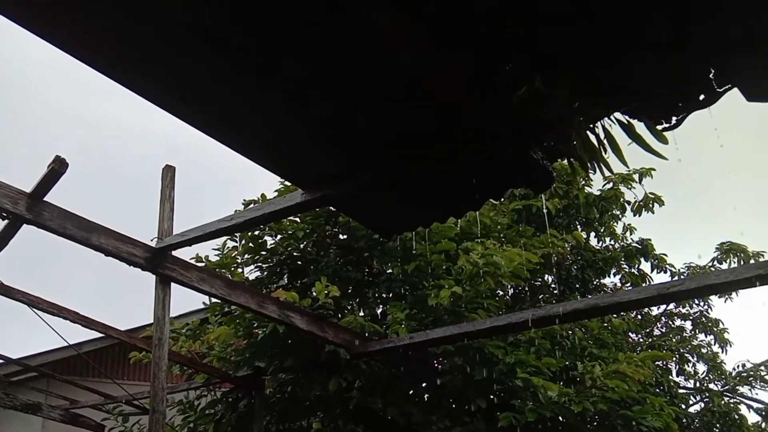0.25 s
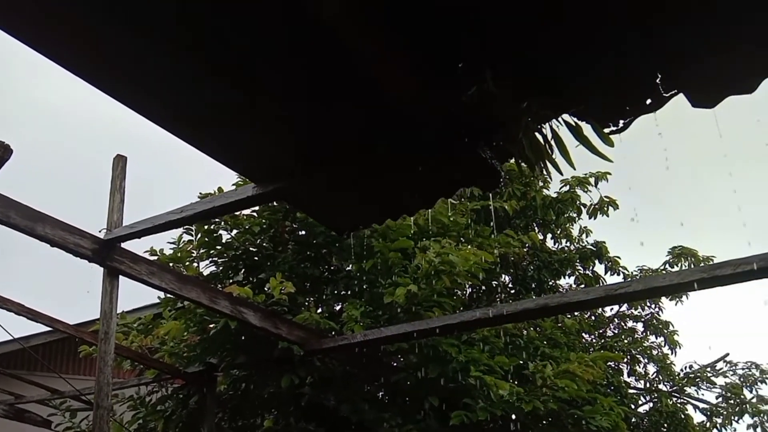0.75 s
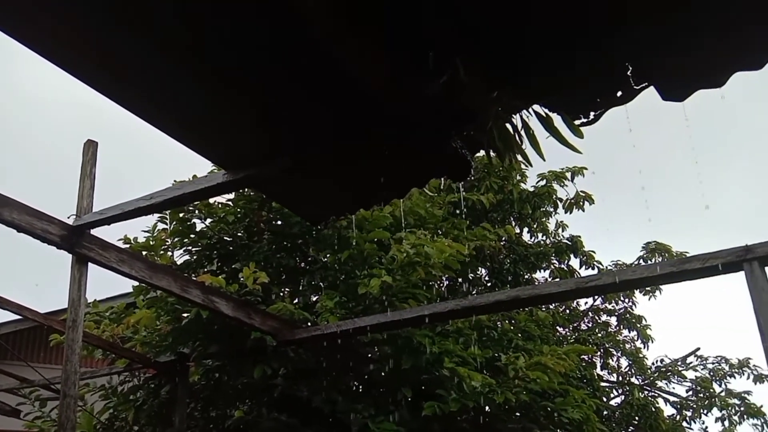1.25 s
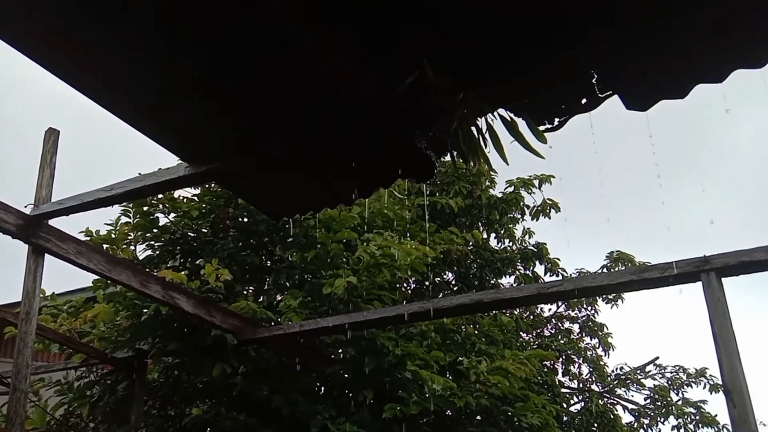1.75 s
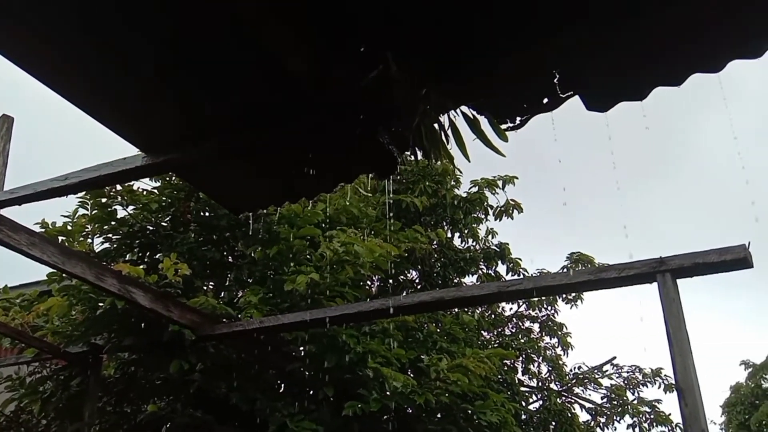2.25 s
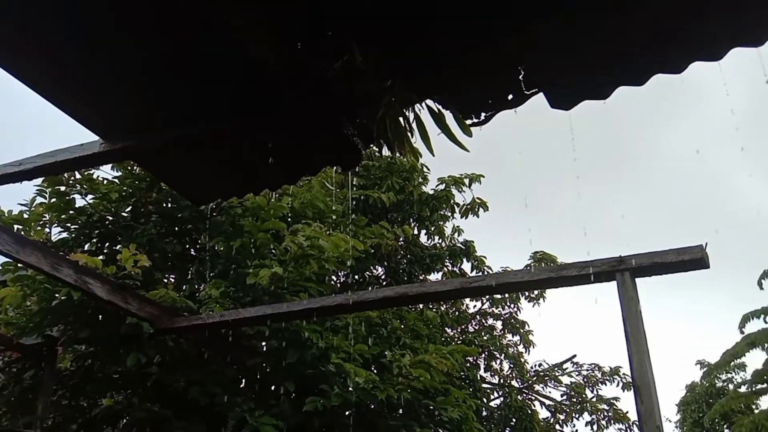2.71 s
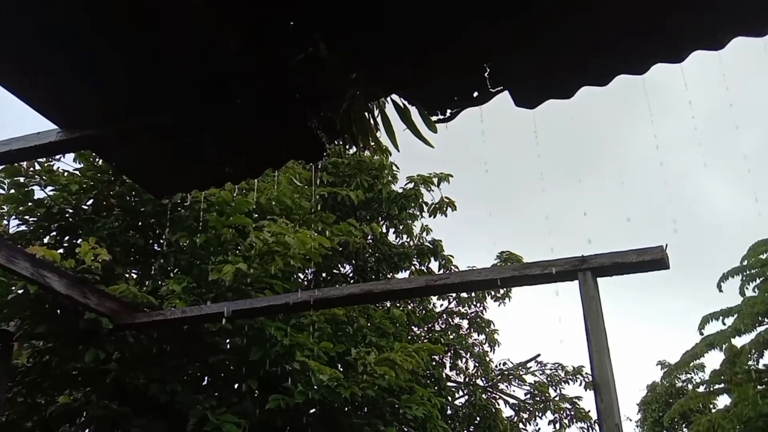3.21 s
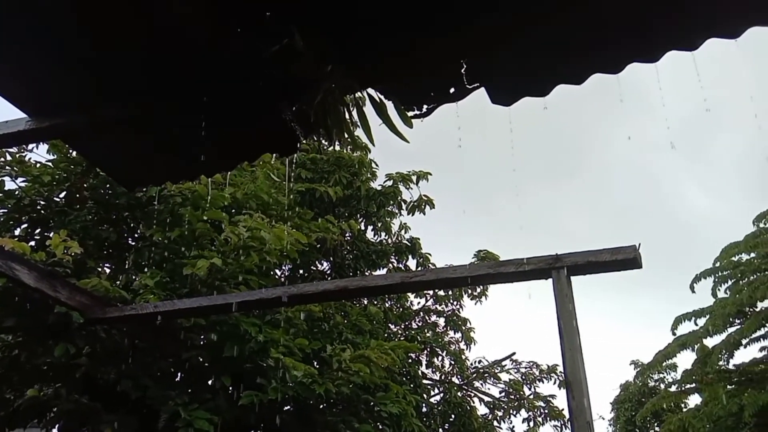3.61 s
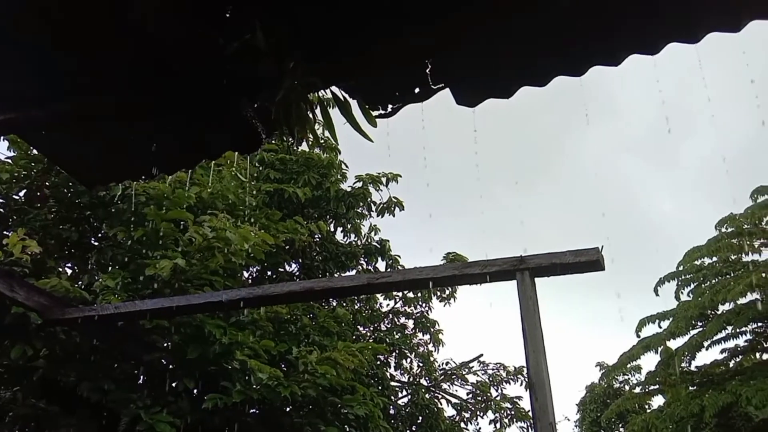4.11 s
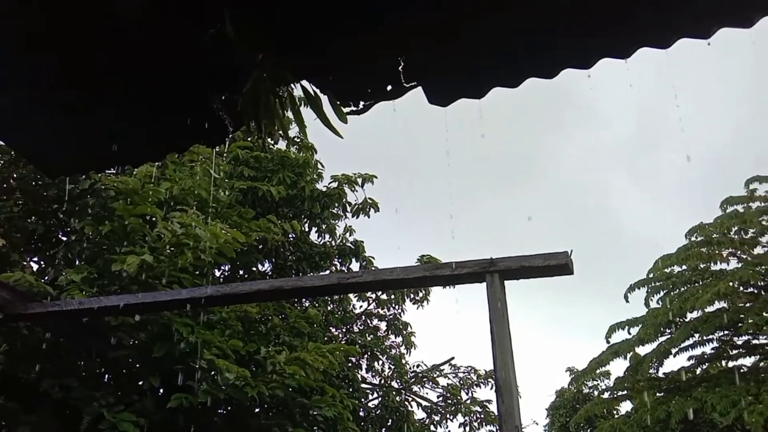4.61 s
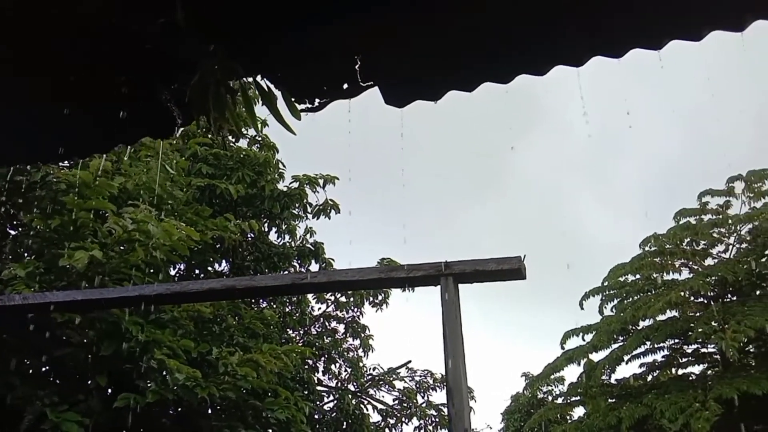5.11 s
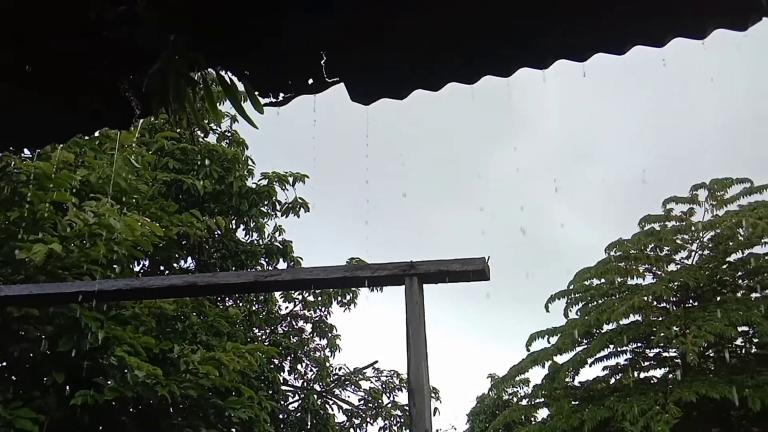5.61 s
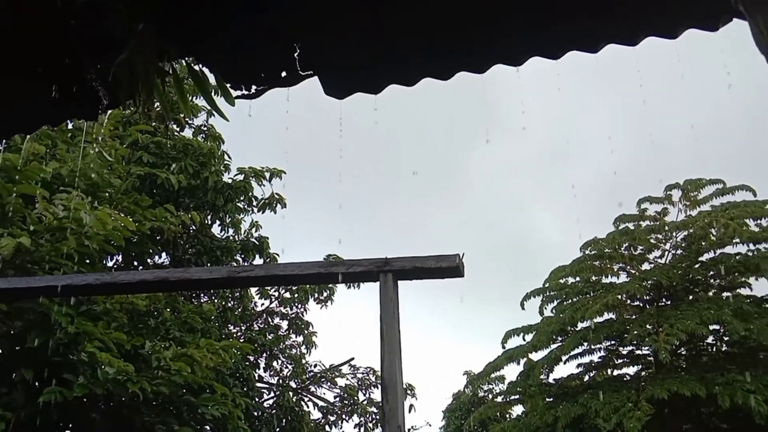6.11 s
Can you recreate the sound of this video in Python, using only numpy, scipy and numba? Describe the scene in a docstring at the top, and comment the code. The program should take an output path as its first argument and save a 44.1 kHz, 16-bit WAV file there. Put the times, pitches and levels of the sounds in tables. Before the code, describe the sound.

Continuous rain and roof run-off surround a sheltered listener. Strings of water break on the ground in dense fine splats and clicks, swelling and easing over distant hiss. Sharp watery ticks come irregularly from close by, while scattered heavy drops make short, dry metal knocks with a small rattle and quick echoes under the roof. A quiet, single-pitched hollow resonance trembles within the wet texture, picked up by a modest handheld microphone.

```python
"""Hiss of steady rain, heard through a phone microphone from under a corrugated metal roof.
Far rain is shaped noise with puddle plops; eaves run-off splashes in spurts; a hollow nearby hums on one note
from a close pair of resonances; dense short rings lie within the hiss. Near drips tick with a spray of noise,
and heavy drops knock the sheet: decaying modes and a rattle, with early echoes under the roof."""
import sys
import numpy as np
from scipy import signal
from scipy.fft import rfft, irfft
from scipy.io import wavfile
from scipy.ndimage import uniform_filter1d
from numba import njit

SR = 44100
rng = np.random.default_rng(int(sys.argv[2]) if len(sys.argv) > 2 else 0)


def put_to_file(sound):
    """Save the sound as 16-bit audio at rate SR, in the file named by the first command-line argument."""
    columns = np.atleast_2d(sound).T  # one column per channel
    safe = np.clip(columns, -1, 1)
    whole_steps = np.round(safe * 32767)
    wavfile.write(sys.argv[1], SR, whole_steps.astype(np.int16))


N = 280035  # length in samples, about 6.35 s


def undb(db):
    """Amplitude factor of a level in dB."""
    return 10 ** (np.asarray(db) / 20)


def level(x, db):
    """Scale a signal to an RMS level in dB."""
    return x * undb(db) / np.sqrt(np.mean(x ** 2))


def fading(t, t60):
    """Exponential decay that loses 60 dB in t60 seconds."""
    return np.exp(-np.log(1000) * t / t60)


def follow(points):
    """Straight lines through (time [s], level [dB]) points, one dB value per sample."""
    return np.interp(np.arange(N) / SR, *np.transpose(points))


def gain_at(hz, points):
    """Gain of (frequency [Hz], level [dB]) points joined on a log frequency axis."""
    point_hz, db = np.transpose(points)
    return undb(np.interp(np.log(hz + 1), np.log(point_hz), db))


def colour(x, points, size=8192):
    """Causal minimum-phase filter from the folded cepstrum of the log gain."""
    cepstrum = irfft(np.log(gain_at(np.arange(size // 2 + 1) * SR / size, points)))
    cepstrum[1:size // 2] *= 2
    cepstrum[size // 2 + 1:] = 0
    impulse = irfft(np.exp(rfft(cepstrum)))
    return signal.fftconvolve(x, impulse)[:len(x)]


def band(x, hz, width):
    """Resonance of a given width in Hz, with gain 1 at the centre."""
    b, a = signal.iirpeak(min(hz, .45 * SR), hz / width, fs=SR)
    return signal.lfilter(b, a, x)


def walk(rate):
    """Random levels held 1 / rate s and slewed twice; spread near 1."""
    hold = int(SR / rate)
    steps = np.repeat(rng.standard_normal(N // hold + 1), hold)
    return 1.3 * uniform_filter1d(uniform_filter1d(steps, hold), hold)[:N]


def sizes(chance, spread_db, most):
    """Random drop sizes: many near 1, a few far from it, none beyond spread_db * most in dB."""
    return undb(spread_db * np.minimum(-np.log(1 - chance), most))


@njit
def grains(start, hz, cycles, size, length):
    """Each drop is a sine that swells for a moment and dies 60 dB within its cycles."""
    out = np.zeros(length)
    for k in range(len(start)):
        fade = np.exp(-np.log(1000) * hz[k] / SR / cycles[k])
        turn = fade * np.exp(2j * np.pi * hz[k] / SR)
        z, onset = size[k] + 0j, 1.
        for i in range(start[k], min(length, start[k] + int(cycles[k] * SR / hz[k]) + 1)):
            out[i] += 2.5 * (1 - onset) ** 2 * z.imag
            z *= turn
            onset *= fade ** 3
    return out


def scatter(count, lo_hz, hi_hz, cycles, spread_db):
    """Drops at random moments and pitches, ringing for half to one and a half times the cycles."""
    when, pitch, ring, big = rng.random((count, 4)).T
    hz = lo_hz * (hi_hz / lo_hz) ** pitch
    # the square root offsets the shorter ring of high drops
    size = sizes(big, spread_db, most=3.97) * np.sqrt(hz)
    return grains((when * N).astype(np.int64), hz, cycles * (.5 + ring), size, N)


def thirds(points):
    """Noise of a given spectrum split into overlapping third octaves: (centre in Hz, band)."""
    hz = np.arange(N // 2 + 1) * SR / N
    noise = rfft(rng.standard_normal(N)) * gain_at(hz, points)
    for centre in 20 * 2 ** (np.arange(30) / 3):
        distance = np.clip(3 * np.log2((hz + 1) / centre), -1, 1)
        share = np.cos(np.pi / 2 * distance) ** 2
        yield centre, irfft(noise * share, N)


def flickering(points, swell_db, flicker_db, rate, bright_hz):
    """Noise bands that swell together and flicker alone: (dull part, bright part)."""
    swell, parts = walk(1.99), np.zeros((2, N))
    for centre, x in thirds(points):
        parts[int(centre > bright_hz)] += x * undb(swell_db * swell + flicker_db * walk(rate))
    return parts


def far_rain():
    """Countless distant drops blur into hiss, with dull plops from puddles."""
    # spectrum of the distant rain, before each part is levelled: (frequency [Hz], density [dB per Hz])
    rain_spectrum = [(25, -8), (60, -14), (120, -6), (250, -4), (500, -7), (1000, -5), (2000, -10.5),
                     (3500, 2.5), (6000, 1), (16000, -2)]
    # quick rises and lulls of the bright rain hiss: (time [s], level [dB])
    bright_levels = [(0, -36.5), (.28, -35.5), (.66, -35.5), (.74, -33), (.96, -38.5), (1.15, -31),
                     (1.33, -37.5), (1.6, -39.5), (1.86, -36.5), (2.19, -36.5), (2.6, -36.5), (2.76, -35.5),
                     (3.09, -38), (3.29, -37.5), (3.71, -37.5), (3.8, -38.5), (3.96, -38), (4.1, -37),
                     (4.42, -39.5), (4.56, -36.5), (4.75, -43), (4.91, -35), (5.02, -38.5), (5.1, -41.5),
                     (5.2, -36.5), (5.31, -36), (5.45, -39), (5.6, -40.5), (5.75, -41.5), (5.87, -34.5),
                     (5.94, -41), (6.05, -39), (6.2, -36), (6.35, -38)]
    dull, bright = flickering(rain_spectrum, swell_db=.8, flicker_db=2.0, rate=9, bright_hz=1500)
    bright_db = follow(bright_levels) + 0.83 * walk(14)
    hiss = level(dull, -52) + level(bright, 0) * undb(bright_db)
    plops = level(scatter(count=500, lo_hz=183.3, hi_hz=880, cycles=10.3, spread_db=3.5), -57.5)
    return hiss + plops


def splats(points, count, octaves, spread_db, t60, t60_tilt):
    """Bursts of hiss around random pitches: sudden start, shorter tail in the treble."""
    when, pitch, big = rng.random((count, 3)).T
    hz = 500 * 32 ** pitch  # 500 Hz to 16 kHz
    power = sizes(big, spread_db, most=3) ** 2
    out = 0
    for centre, x in thirds(points):
        nearness = np.exp(-(np.log2(hz / centre) / octaves) ** 2)
        hits = np.bincount((when * N).astype(int), power * nearness, N)
        band_t60 = t60 * (centre / 4000) ** -t60_tilt  # t60 itself holds at 4 kHz
        fade = np.exp(-2 * np.log(1000) / SR / band_t60)  # power fades twice as fast in the exponent
        out = out + x * np.sqrt(signal.lfilter([1 - fade], [1, -fade], hits))
    return out


def runoff():
    """Water strings from the eaves break on the ground in narrow and broad splats, drops and clicks."""
    # spurts and lulls of the eaves: (time [s], splash level [dB])
    spurts = [(0.0, -34.5), (0.26, -31.5), (0.55, -39.5), (1.18, -35), (1.84, -30.5), (2.16, -39),
              (2.42, -37.5), (2.55, -38.5), (3.27, -33.5), (3.77, -40), (4.47, -38.5), (4.56, -34.5),
              (4.9, -35.5), (5.0, -39.5), (5.78, -36.5), (5.91, -36.5), (6.08, -41), (6.35, -34.5)]
    # spectrum of the splash noise, before levelling: (frequency [Hz], density [dB per Hz])
    splash_spectrum = [(300, -12), (800, 1.5), (2000, -3.5), (3000, 2.5), (6000, -2), (10000, 0),
                       (16000, 8)]
    spray = level(splats(splash_spectrum, count=2500, octaves=0.17, spread_db=3.5, t60=0.22, t60_tilt=0.12), -2.06)
    slaps = level(splats(splash_spectrum, count=250, octaves=1.3, spread_db=4.0, t60=0.11, t60_tilt=0.18), -6)
    # the negative spread makes a few drops smaller than the rest
    drops = level(scatter(count=8000, lo_hz=1780, hi_hz=16000, cycles=4.6, spread_db=-2.5), -15.0)
    clicks = level(scatter(count=900, lo_hz=4530, hi_hz=13000, cycles=3.5, spread_db=4.5), -15)
    return undb(follow(spurts)) * (spray + slaps + drops + clicks)


def hollow():
    """Drops and a trickle stir a hollow, whose close pair of modes beats and wavers."""
    # the pair of modes: (frequency [Hz], width [Hz], relative level [dB])
    hollow_modes = [(1255.6, 28, 1.5), (1288.5, 42, 0)]
    # the hum swells and sinks: (time [s], level [dB])
    hum_swells = [(0, -41), (.12, -44), (.42, -45), (.63, -41), (1.4, -45.5), (1.63, -40.5), (1.84, -43.5),
                  (2.17, -43), (3.22, -43), (3.75, -42.5), (4.1, -40.5), (4.47, -44), (4.76, -44.5),
                  (4.95, -41.5), (5.39, -47), (5.66, -38), (5.89, -43.5), (6.35, -42)]
    when, side, big = rng.random((1200, 3)).T
    pushes = np.sign(side - .5) * sizes(big, 2.6, most=3.9)
    drops = np.bincount((when * N).astype(int), pushes, N)
    trickle = level(rng.standard_normal(N), 1)
    stir = level(drops, 0) + trickle
    hum = sum(undb(db) * band(stir, hz, width) for hz, width, db in hollow_modes)
    waver_db = 1.5 * walk(25)
    return level(hum * undb(waver_db), 0) * undb(follow(hum_swells))


def short_rings():
    """Dense short narrow rings at random pitches within the hiss, a lower and a higher cloud."""
    low_rings = level(scatter(count=3000, lo_hz=307.3, hi_hz=3044, cycles=57, spread_db=6.5), -53.5)
    high_rings = level(scatter(count=7000, lo_hz=1500, hi_hz=14000, cycles=110, spread_db=2.4), -41.5)
    return low_rings + high_rings


def ticks(s, peak_db, hz, cycles, spray_db, spray_t60):
    """A short tick at each drop's pitch, an overtone that high drops lack, a ground echo and a hiss of spray."""
    delay_s = .0012  # short fixed delay from the listed time to the tick
    start = ((s + delay_s) * SR).astype(np.int64)
    cycles = np.clip(cycles, 1, 40)
    out = grains(start, hz, cycles, undb(peak_db), N + SR)
    overtone_hz = np.minimum(1.78 * hz, .4 * SR)
    overtone_db = peak_db + 3.5 - 2.1 * hz / 1000
    out = out + grains(start, overtone_hz, cycles, undb(overtone_db), N + SR)
    out = out + undb(-13.5) * np.roll(out, int(0.0045 * SR))  # ground echo
    t = np.arange(SR // 4) / SR
    for k in range(len(s)):
        hiss, grain = rng.standard_normal((2, len(t)))
        # the spray is made of droplets: its level jitters by 3 dB, smoothed over 1/600 s
        grain_db = 3 * level(uniform_filter1d(grain, SR // 600), 0)
        high_pass = signal.butter(6, hz[k] * 0.7, "high", fs=SR, output="sos")
        hiss = signal.sosfilt(high_pass, hiss * undb(grain_db))
        hiss = band(band(hiss, hz[k] * 0.97, hz[k] * 0.53), hz[k] * 1.06, hz[k] * 1.4)
        swell = 1 - np.exp(-t / 0.0044)
        out[start[k]:start[k] + len(t)] += level(hiss, spray_db[k]) * swell * fading(t, spray_t60[k])
    return out[:N]


def drips():
    """Near drips with the fine spatter they throw off, and stray droplets in the high treble."""
    # near drips, spray level before its swell and fade: (time [s], tick strength [dB],
    # pitch [Hz], spray level [dB], spatter strength [dB])
    near_drips = [(0.07, -22, 7440, -35, -40), (0.08, -20, 9400, -15.5, -40), (0.13, -24, 3000, -40, -40),
                  (0.5105, -25, 5450, -30.5, -40), (0.7114, -27, 3500, -30, -26),
                  (0.713, -23, 5800, -31, -40), (0.738, -26, 3400, -31, -40), (0.773, -24, 6640, -35, -40),
                  (0.842, -18, 8920, -33, -40), (1.057, -21, 8540, -25, -40), (1.131, -18, 10600, -28, -40),
                  (1.1798, -19, 9350, -19, -40), (1.321, -16, 9590, -24, -40),
                  (1.3622, -30, 6650, -46, -15), (1.403, -24, 7150, -31.5, -13),
                  (1.502, -18, 7360, -34, -28.5), (1.6255, -14.5, 5500, -34, -11.5),
                  (1.9063, -20, 6150, -32, -20), (2.325, -27, 7000, -34.5, -40),
                  (2.373, -20, 6980, -37, -16), (2.476, -20, 9600, -21, -40), (2.5226, -20, 6870, -44, -40),
                  (2.62, -17, 10100, -20, -40), (2.6286, -19, 4600, -34, -40), (2.66, -26, 3780, -31, -40),
                  (2.7488, -16, 7150, -38, -40), (2.822, -16, 10400, -26, -40),
                  (2.8904, -27, 3030, -30.5, -40), (2.92, -19, 9110, -30, -40),
                  (3.1304, -28, 3540, -31.5, -40), (3.2785, -27, 4800, -34, -40),
                  (3.3434, -26, 5750, -29, -40), (3.7442, -22, 4300, -33, -40),
                  (3.752, -27, 3000, -38, -40), (3.77, -21, 8560, -26, -40), (3.786, -20, 5500, -34, -17.5),
                  (3.9855, -9.5, 5850, -32, -2.5), (4.061, -25, 5540, -44, -40),
                  (4.1194, -28, 3460, -47, -40), (4.192, -20, 7310, -49, -22), (4.247, -23, 5400, -33, -15),
                  (4.485, -21, 9040, -23, -37), (4.5575, -17.5, 10600, -23, -40),
                  (4.592, -24, 4030, -36, -26), (4.768, -21, 5520, -40, -21), (4.8206, -31, 3510, -36, -16),
                  (4.803, -20, 5600, -50, -40), (4.8656, -28, 5600, -32.5, -40),
                  (4.947, -31, 3950, -33, -30), (5.093, -12, 10000, -36, -48),
                  (5.1182, -17, 5730, -41, -34), (5.15, -31, 3850, -33, -40), (5.208, -27, 3180, -31, -40),
                  (5.339, -17, 5630, -34, -14.5), (5.77, -12.5, 2970, -30, -19),
                  (5.846, -33, 2880, -34, -40), (5.869, -29, 2650, -49, -40), (5.9518, -21, 5030, -47, -23),
                  (6.2077, -24, 2850, -32.5, -40), (6.251, -11, 10300, -28, -40)]
    ring_cycles = 13  # at 5 kHz; lower drips ring for more cycles
    spray_t60_s, tiny_spray_t60_s, tiny_hz = 0.25, 0.036, 8000  # drips above tiny_hz are tiny
    s, peak_db, hz, spray_db, spatter_db = np.transpose(near_drips)
    same = np.ones(len(s))
    cycles = ring_cycles * (hz / 5000) ** -.5
    body = ticks(s, peak_db, hz, cycles, spray_db, np.where(hz > tiny_hz, tiny_spray_t60_s, spray_t60_s))
    spatter = ticks(s, spatter_db, 8530 * same, ring_cycles * same, spatter_db - 14, tiny_spray_t60_s * same)
    strays = level(scatter(count=40, lo_hz=8200, hi_hz=9600, cycles=18, spread_db=1.5), -59)
    return body + spatter + strays


def knocks():
    """A heavy drop rings the sheet's modes, most near its favoured pitches, and leaves a rattle."""
    # heavy drops: (time [s], level of the modes over the first 20 ms [dB], favoured low [Hz],
    # favoured middle [Hz], favoured high [Hz], deep share [dB], middle share [dB], bright share [dB],
    # rattle relative to the modes [dB])
    heavy_drops = [(0.172, -27, 904, 1720, 3900, -7, 1.5, 4, -8),
                   (1.1863, -26.5, 1050, 2050, 4320, -18, -8, 0, -20),
                   (1.1932, -31, 1290, 2050, 4370, -16, -2, 1, -3),
                   (1.256, -41, 1000, 2620, 4500, -1, -11, -4, -10),
                   (1.519, -42, 1030, 1720, 3040, 12, -12, 7, -4),
                   (4.445, -38.5, 1290, 2160, 4460, -4, 3, 9, -2),
                   (4.528, -33, 1290, 2620, 4500, -5, 0, 4, -8),
                   (4.5328, -28.5, 1290, 2600, 3320, -2, 3, 5.5, -6),
                   (5.493, -38.5, 970, 1720, 2620, -4, -15, 1, -10),
                   (5.614, -29, 1730, 3570, 4320, -6, 1, 8, -5.5),
                   (5.7005, -33, 1150, 1720, 2600, -9, 0, 2.5, -13),
                   (6.089, -40, 950, 1720, 3100, 3, -6, 13, 1),
                   (6.311, -39, 694, 1720, 3800, 11, 2, 15, -10)]
    # modes of the metal sheet: (frequency [Hz], relative level [dB], 60 dB decay [s])
    sheet_modes = [(503, -23, 0.08), (625, -5, 0.031), (724, -1.5, 0.048), (945, 4, 0.042),
                   (1098, 3.5, 0.034), (1170, -19, 0.034), (1278, 3, 0.088), (1490, 3, 0.04),
                   (1720, -1, 0.058), (1860, 4, 0.037), (2080, -22, 0.034), (2593, -4.5, 0.043),
                   (2800, -4, 0.035), (3280, -6.5, 0.07), (3467, -1.5, 0.036), (3700, -6, 0.035),
                   (3880, -7.5, 0.042), (4324, 0.5, 0.033), (4564, -5.5, 0.043), (5060, -3.5, .03)]
    favour_db, first = 7, int(.02 * SR)  # lift of the favoured modes; samples that set a knock's level
    out, t = np.zeros(N + SR), np.arange(SR // 4) / SR
    hz, db, t60 = np.transpose(sheet_modes)
    decays = fading(t, t60[:, None])
    for s, level_db, low_hz, middle_hz, high_hz, deep_db, middle_db, bright_db, rattle_db in heavy_drops:
        level_draw, pitch_draw, sign_draw = rng.standard_normal((3, len(hz)))
        favoured = ((low_hz, .1), (middle_hz, .04), (high_hz, .04))
        near = sum(np.exp(-(np.log(hz / f) / wide) ** 2) for f, wide in favoured)
        share_db = np.select([hz > 2300, hz > 1400, hz < 850], [bright_db, middle_db, deep_db], 0)
        gain = undb(db + 1.5 * level_draw + favour_db * near + share_db)
        mode_hz = hz * (1 + 0.0083 * pitch_draw)
        # each mode starts up or down at random
        modes = (gain * np.sign(sign_draw)) @ (np.sin(2 * np.pi * np.outer(mode_hz, t)) * decays)
        noise = rng.standard_normal((2, len(t)))
        low = band(band(noise[0], 1150, 1100), 1150, 1100)
        high = band(band(noise[1], high_hz, 3500), high_hz, 3500)
        # the rattle is duller than the modes
        rattle = (low + undb(bright_db - 10) * high) * fading(t, 0.23)
        blow = modes / modes[:first].std() + undb(rattle_db) * rattle / rattle[:first].std()
        blow = blow * (1 - np.exp(-t / .0005))  # short rise
        begin = int(s * SR)
        out[begin:begin + len(t)] += undb(level_db) * blow
    return out[:N]


def shelter(x):
    """Early echoes under the roof, delayed copies whose ends wrap round to the start."""
    # echoes off ground, beams and wall: (delay [s], level [dB])
    echo_paths = [(.005, -2.5), (.0095, -6), (0.02, -9)]
    return x + sum(undb(db) * np.roll(x, int(s * SR)) for s, db in echo_paths)


def scene():
    """The sheet knocks in the shelter, over the spread-out rain and the near drips."""
    return (far_rain() + runoff() + hollow() + short_rings() + drips() + shelter(knocks()))[None]


def record(dry):
    """The microphone drops the deep bass, its port notches and dulls the treble; the top is cut."""
    # treble response of the microphone: (frequency [Hz], gain [dB])
    mic_response = [(4000, 0), (4900, -1), (5700, 3), (6250, -3.5), (6750, 3), (7450, 2), (8050, -8.5),
                    (9200, -6.5), (11500, -13.5), (13900, -25), (14900, -9), (16000, -20)]
    bass_cut = signal.butter(3, 60, "high", fs=SR, output="sos")
    top_cut = signal.ellip(12, .2, 70, 15500, fs=SR, output="sos")
    heard = signal.sosfilt(bass_cut, colour(dry[0], mic_response))
    return signal.sosfilt(top_cut, heard)[None]


dry = scene()
out = record(dry)
put_to_file(out)
```